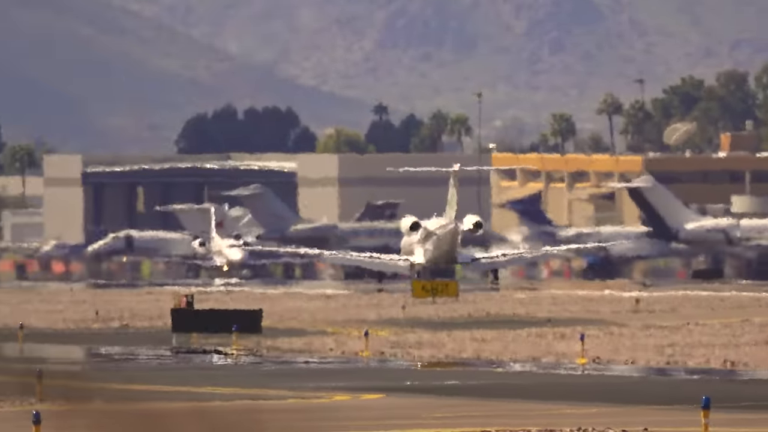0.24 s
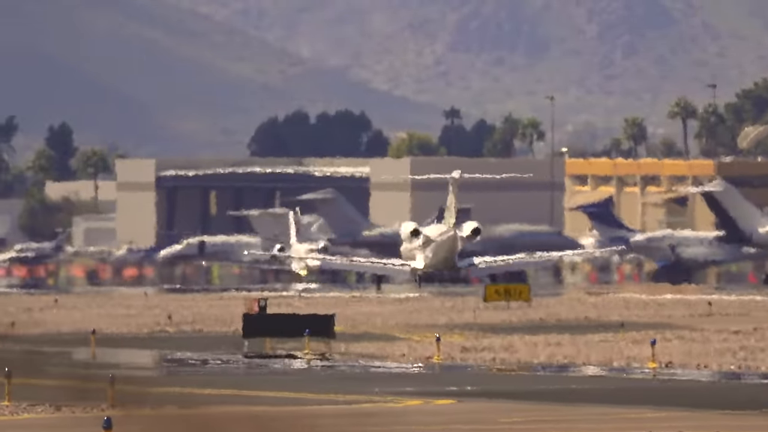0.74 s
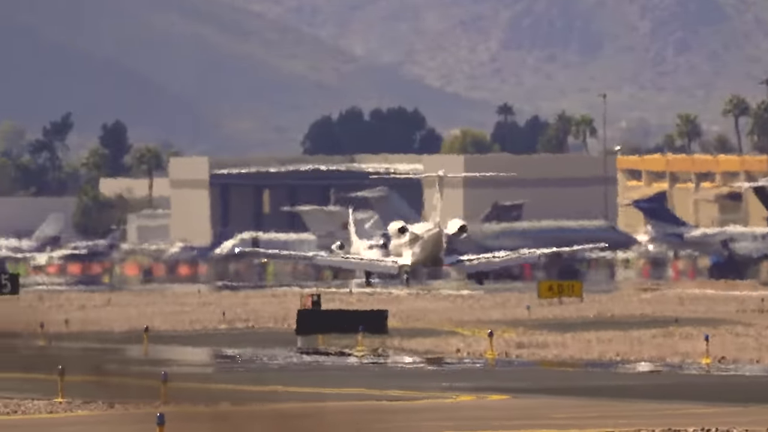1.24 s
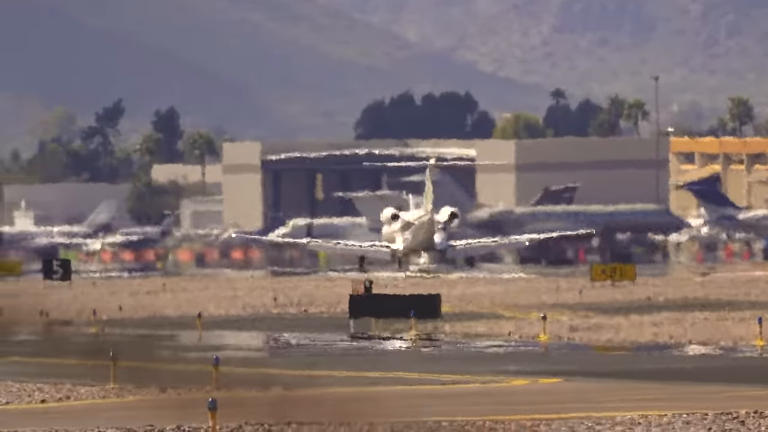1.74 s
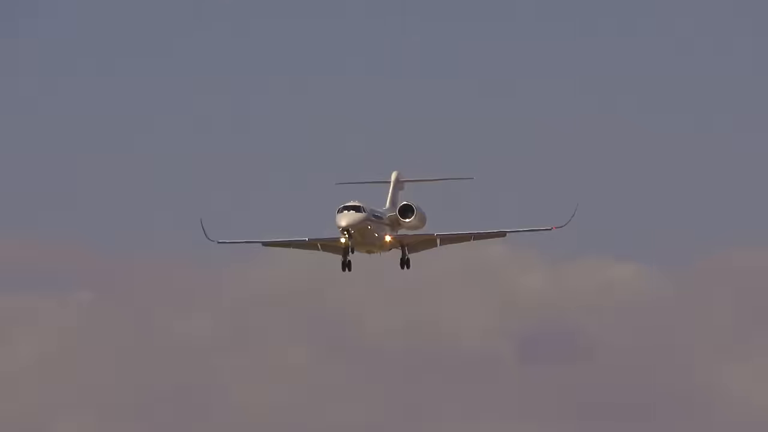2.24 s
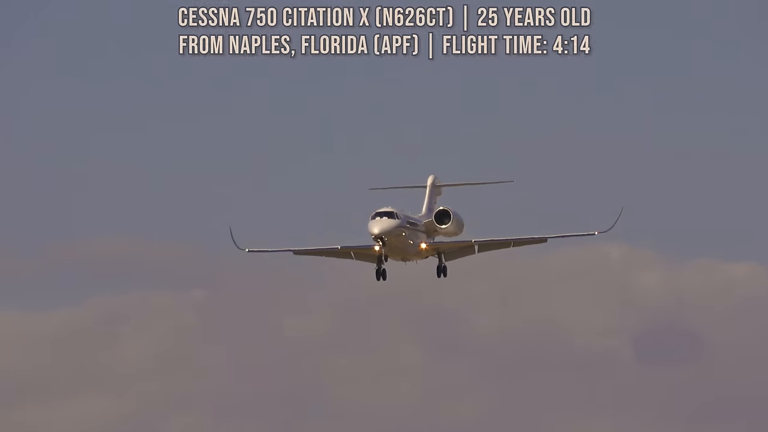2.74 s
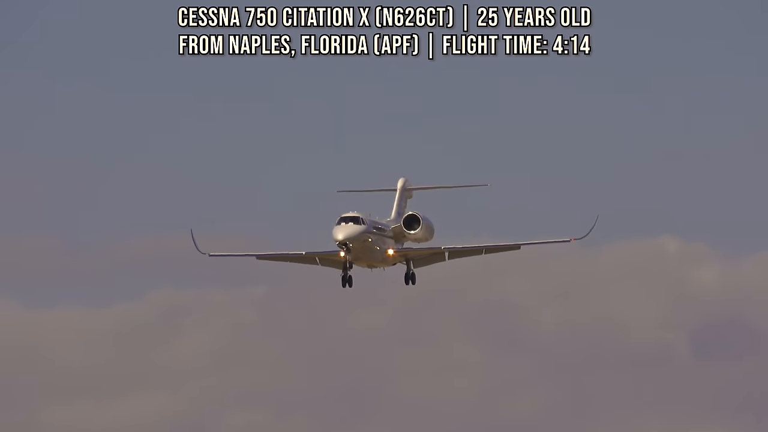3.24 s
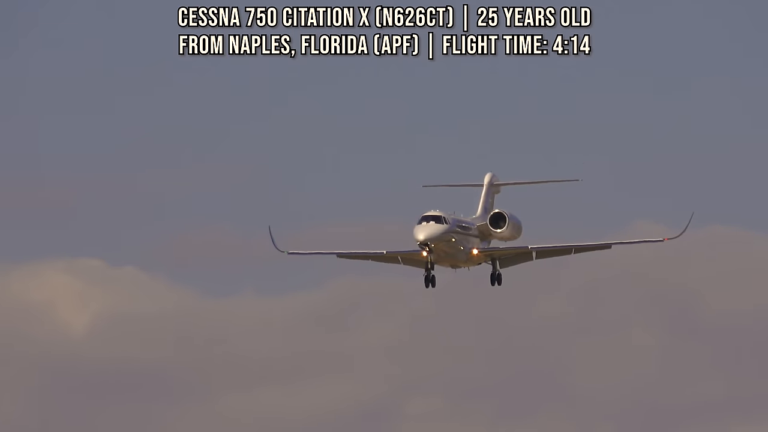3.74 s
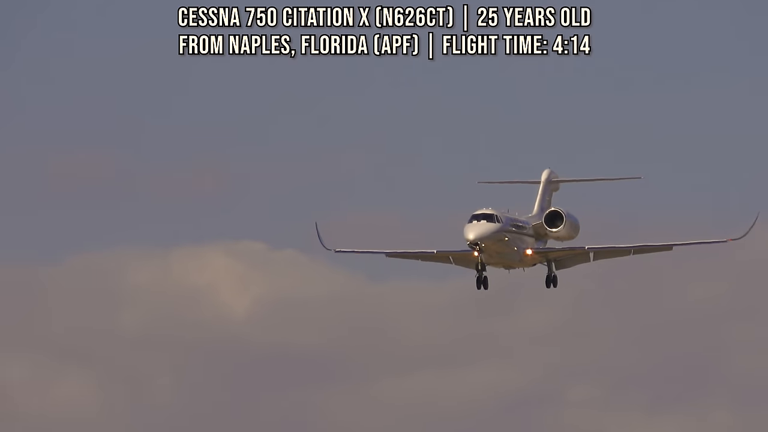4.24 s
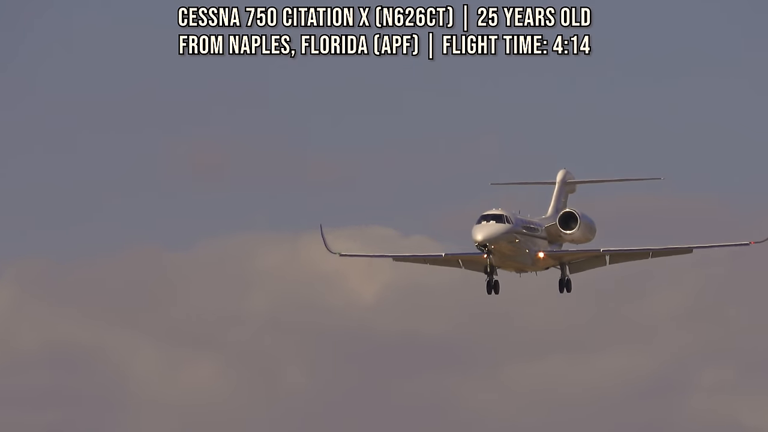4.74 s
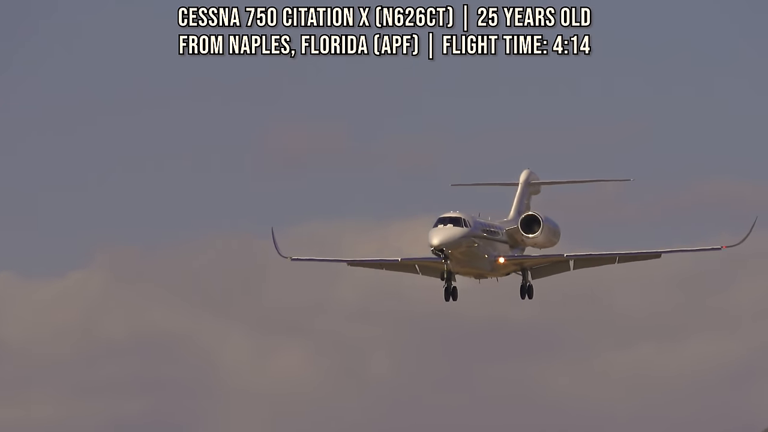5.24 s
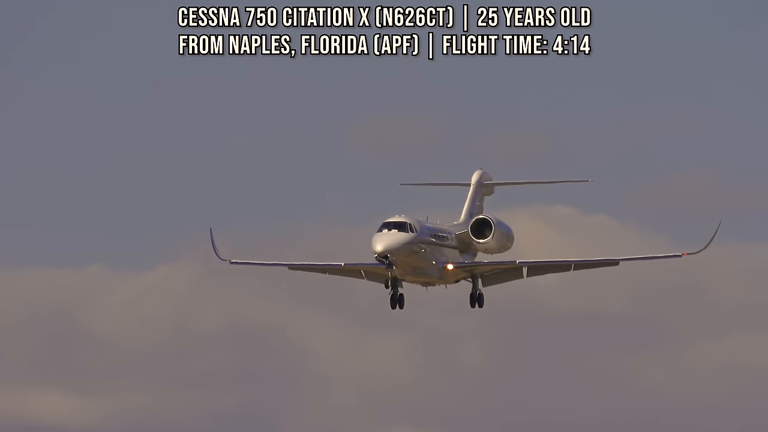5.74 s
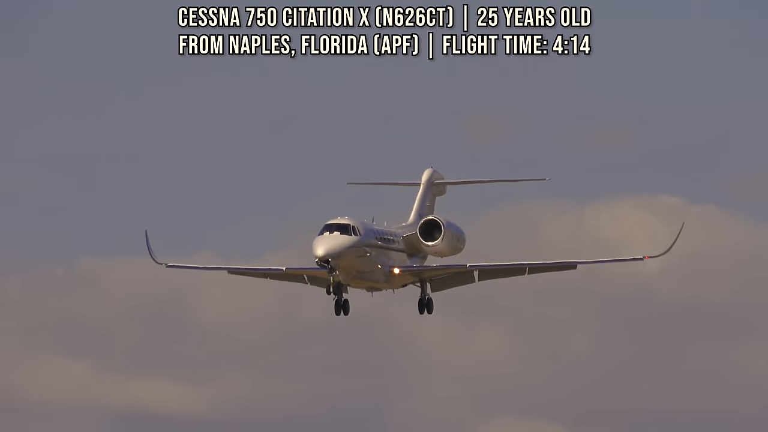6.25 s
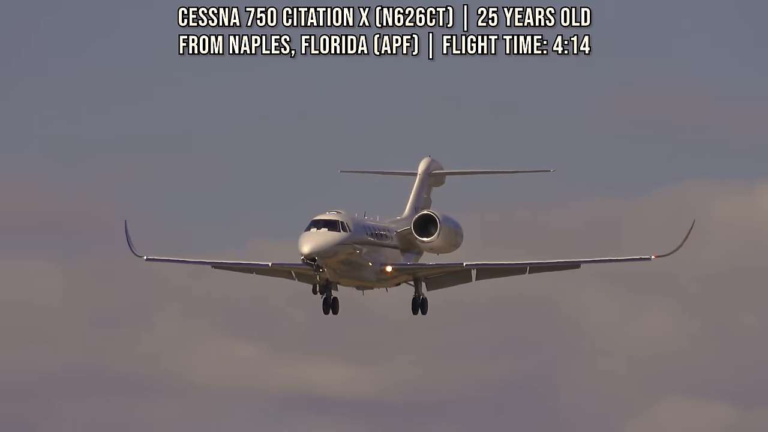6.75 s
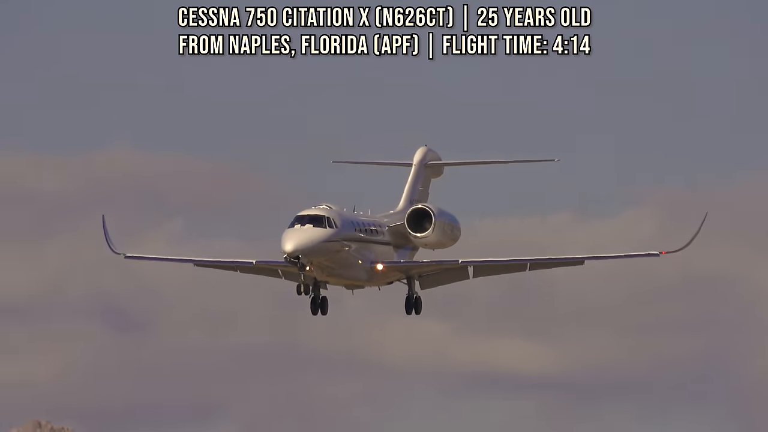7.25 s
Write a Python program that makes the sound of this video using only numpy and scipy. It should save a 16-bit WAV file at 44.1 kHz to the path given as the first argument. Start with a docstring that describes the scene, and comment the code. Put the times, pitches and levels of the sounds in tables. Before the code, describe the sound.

Low far-off jet roar leaning left melts into a wide near jet rush, droning and beating steadily, with hiss flaring and faint ticks.

```python
"""An airfield in two views joined by a cross-fade. First, far engines roar from the left: shaped noise
with thin turbine whines (unsteady sines). An idling engine drones through both views on multiples of one rate.
Then a propeller beats close by, as pulses, in front of a wide jet rush of shaped noise with its own whines;
its treble comes and goes with the turbulent air. Faint ticks, snaps of noise, sit on top.
The recorder rounds off the highest peaks and cuts off the very top of the treble."""
import sys
import numpy as np
from scipy import signal
from scipy.fft import rfft, irfft, next_fast_len
from scipy.io import wavfile
from scipy.ndimage import uniform_filter1d, map_coordinates

SR = 44100
rng = np.random.default_rng(int(sys.argv[2]) if len(sys.argv) > 2 else 0)


def transcribe(signal):
    """Save signal, clipped to [-1, 1], as a 16-bit WAV file at the path in sys.argv[1]."""
    frames = np.atleast_2d(signal).T
    limited = np.clip(frames, -1, 1)
    pcm = np.round(limited * 32767).astype(np.int16)
    wavfile.write(sys.argv[1], SR, pcm)


N = 330750  # samples, 7.5 s


def amp(db):
    """Turn a level in dB into a gain."""
    return 10 ** (np.asarray(db) / 20)


def along(points, hz):
    """Read a curve of (frequency [Hz], value) points on a log frequency axis."""
    point_hz, values = np.transpose(points)
    return np.interp(np.log(hz + 1), np.log(point_hz + 1), values)


def curves(rows):
    """Draw straight lines through the rows: one value per sample for each column after the time."""
    times, *columns = np.transpose(rows)
    t = np.arange(N) / SR
    return np.array([np.interp(t, times, column) for column in columns])


def wobble(rate):
    """A smooth random curve with `rate` random points a second."""
    knots = rng.standard_normal(int(N * rate / SR) + 4)
    return map_coordinates(knots, [np.arange(N) * rate / SR])


def sides(left_db):
    """Left and right gains for a lean to the left in dB; the two gains always add up to 2."""
    share = 1 / (1 + amp(-np.asarray(left_db)))
    return 2 * np.array([share, 1 - share])


def roar(colour, humps, alike, left, bands, levels_db, patchy_db, drift_db, sway_db=0, swell=None):
    """Stereo turbulence noise: each band follows its level, neighbours blend, random patches drift over it."""
    hop = 512  # samples between short spectra
    frames = dict(nperseg=4 * hop, noverlap=3 * hop)
    hz, t, (a, b) = signal.stft(rng.standard_normal((2, N + 2 * hop)), SR, **frames)
    at = np.minimum(np.arange(len(t)) * hop, N - 1)  # sample at each spectrum

    hump_db = sum(db * np.exp(-((hz - centre) / width) ** 2) for centre, width, db in humps)
    shape = amp(along(colour, hz) + hump_db)

    # Cancel the level that the colour alone gives each band, then set the wanted one.
    held = [np.sqrt(2 * np.sum(shape[(hz > lo) & (hz < hi)] ** 2) / (4 * hop)) for lo, hi in bands]
    centres = [np.sqrt(lo * hi) for lo, hi in bands]
    blend = np.array([along(list(zip(centres, row)), hz) for row in np.eye(len(bands))])
    moving_db = blend.T @ (levels_db[:, at] - 20 * np.log10(held)[:, None])

    if swell is not None:  # a narrow lift at the moving frequency, with a wide shallow dip around it
        swell_hz, swell_db = swell[:, at]
        distance = np.log(hz[:, None] / swell_hz + 1e-9)
        lift = np.exp(-(distance / 0.15) ** 2)
        dip = 0.23 * np.exp(-distance ** 2)
        moving_db += swell_db * (lift - dip)

    # Random patches, smoothed over frequency and then over time.
    fields = rng.standard_normal((2, *a.shape))
    fields = uniform_filter1d(uniform_filter1d(fields, size=30, axis=1), size=5, axis=2)
    unrest = np.clip(hz / 2500, .3, 1.2)[:, None]  # eddies disturb short waves most
    patch, drift = fields / fields.std() * unrest

    # Mix two independent noises so that left and right are as alike as wanted.
    turn = np.arccos(np.clip(along(alike, hz), -1, 1))[:, None] / 2
    shared, apart = np.cos(turn) * a, np.sin(turn) * b
    pair = np.array([shared + apart, shared - apart]) / np.cos(turn)

    sway = np.clip(hz / 4000, 0, 1)[:, None] * np.broadcast_to(sway_db, N)[at]
    lean_db = along(left, hz)[:, None] + drift_db * drift + sway
    pair *= shape[:, None] * amp(moving_db + patchy_db * patch) * sides(lean_db)
    return signal.istft(pair, SR, **frames)[1][:, :N]


def tones(table, flutter_db, rate, heard_db=None):
    """Unsteady sines: pitch wavers, level flutters slowly and shivers fast in the air."""
    out = np.zeros((2, N))
    for k, (hz, db, left_db, waver_hz) in enumerate(table):
        cycles = np.cumsum(hz + waver_hz * wobble(25)) / SR + rng.random()
        level_db = db + flutter_db * wobble(rate) + 2.3 * wobble(30)
        if heard_db is not None:
            level_db = level_db + heard_db[k]
        sine = np.sqrt(2) * amp(level_db) * np.sin(2 * np.pi * cycles)
        out += sides(left_db)[:, None] * sine
    return out


def faded():
    """How far the cross-fade has gone, 0 to 1."""
    start_s, length_s = 1.59, 0.87
    return np.clip((np.arange(N) / SR - start_s) / length_s, 0, 1)


def far_engines():
    """Far engines: turbulent exhaust makes a wide noise, turning parts add hums and whines."""
    # Starting levels of rumble, roar, rush and hiss [dB]
    far_levels = [-24.5, -37, -49.5, -63.5]
    # How far each of these four wanders [dB]
    far_sway = [1.3, .5, .4, .4]
    # Colour of the noise: (frequency [Hz], relative level [dB per Hz])
    far_colour = [(22, -31), (45, -26), (55, -9), (120, -3), (270, -7), (450, -13.5), (900, -21.5),
                  (2000, -33.5), (3000, -42.5), (4300, -43.5), (6300, -50), (9200, -59), (10400, -52.5),
                  (11500, -62.5), (15500, -75)]
    # Likeness of left and right: (frequency [Hz], likeness [1 = the same])
    far_alike = [(60, 0.99), (200, 1), (1000, 0.99), (4000, 0.84), (6000, 0.62), (7300, 0.12), (10000, .6),
                 (13000, .3)]
    # Lean to the left: (frequency [Hz], left over right [dB])
    far_left = [(60, 1), (100, -1), (170, -3), (280, 10.5), (470, 8.5), (800, 7), (1340, 7.0), (2240, 8.5),
                (3760, 11), (6300, 10)]
    # Hums and whines: (frequency [Hz], level [dB], left over right [dB], pitch waver [Hz])
    far_tones = [(58.5, -31, -2, 3), (117, -32, -2, 3), (838, -55, 8, 3), (1703, -61, 8, 4),
                 (2171, -65, 9, 4), (2682, -66, 9, 4), (3752, -68, 11, 6), (8258, -78, 9, 6),
                 (10191, -78, 9, 20), (10398, -77, 10, 5), (10428, -75, 10, 5)]
    bands = [(40, 230), (550, 1500), (3000, 6000), (8500, 12000)]  # Hz
    rumble_fall = 2  # dB per second, as the jet rolls away

    levels_db = np.array([db + sway_db * wobble(4) for db, sway_db in zip(far_levels, far_sway)])
    levels_db[0] -= rumble_fall * (np.arange(N) / SR - .8)
    noise = roar(far_colour, [], far_alike, far_left, bands, levels_db, patchy_db=.6, drift_db=1.5)
    return noise + tones(far_tones, flutter_db=0.5, rate=4.4)


def drone():
    """Idling engine: multiples of one shaft rate, each fluttering by itself, heard through both views."""
    # Parts of the hum: (multiple of the shaft rate, level before the gain of each view [dB])
    parts = [(4, -29.5), (5, -49), (6, -39.5), (7, -41.5)]
    shaft_hz = 70.87
    first_gain_db, second_gain_db = -0.4, -6
    first_left_db, second_left_db = 7.5, -7  # left over right in each view

    gone = faded()
    gain_db = first_gain_db + (second_gain_db - first_gain_db) * gone
    left_db = first_left_db + (second_left_db - first_left_db) * gone
    turn = 2 * np.pi * np.cumsum(shaft_hz + 0.11 * wobble(3)) / SR
    hum = 0
    for k, db in parts:
        level = amp(db + 0.74 * wobble(4.6))
        hum = hum + level * np.sin(k * turn + 2 * np.pi * rng.random())
    return sides(left_db) * np.sqrt(2) * amp(gain_db) * hum


def propeller():
    """Propeller: one pressure pulse per blade, so the multiples of the blade rate peak together."""
    # Loudness of the beat: (time [s], level [dB])
    beat_levels = [(1.8, -23), (2.3, -17), (2.8, -16), (3.2, -18), (4.1, -19), (6.2, -18.5), (7.5, -18)]
    # Make-up of each pulse: (multiple of the blade rate, relative level [dB])
    orders = [(1, -4.5), (2, 0), (3, -8.5), (4, -23)]
    blade_hz = 83.17  # blades passing per second

    turn = 2 * np.pi * (np.cumsum(blade_hz + .06 * wobble(2)) / SR + rng.random())
    beat = 0
    for k, db in orders:
        level = amp(db + .4 * wobble(5))
        beat = beat + level * np.cos(k * turn + .08 * wobble(6))
    return sides(-.3)[:, None] * np.sqrt(2) * amp(curves(beat_levels)) * beat


def jet_rush():
    """Near jet: turbulent noise with moving bands, and turbine whines: some follow the rush or its treble,
    one has its own level curve, one sounds briefly."""
    # Rumble and growl: (level at middle_s [dB], rise [dB per s], wander [dB])
    low_rows = [(-19.5, .2, 1.1), (-32, -0.5, 1)]
    # Middle of the rush: (time [s], body level [dB], breath level [dB], rush level [dB])
    middle_rows = [(1.8, -36.5, -31, -31.5), (2.25, -33, -33.5, -32), (2.75, -37.5, -31.5, -32),
                   (3.4, -35.5, -35, -30.5), (3.9, -35.5, -34.5, -31.5), (4.4, -32, -34, -29.5),
                   (5.2, -33.5, -33.5, -29), (5.7, -32, -33, -28), (6.3, -33.5, -35.5, -29),
                   (6.86, -36, -33, -30.5), (7.2, -32, -34, -28.5), (7.5, -32, -32.5, -28)]
    # Treble: (time [s], hiss level [dB], fizz level [dB], sway to the left around its mean [dB])
    treble_rows = [(1.8, -36, -57.5, 12.5), (2.02, -40.5, -50, 13), (2.63, -41, -55, -1.5),
                   (2.93, -42.5, -57.5, -0.5), (3.31, -37, -50.5, 7), (3.42, -31.5, -50, 14),
                   (3.5, -36, -54.5, 14.5), (3.69, -42.5, -55.5, 2.5), (4.16, -38.5, -55, -8),
                   (4.47, -36, -55.5, 1), (4.97, -37, -53.5, -2.5), (5.15, -41, -47.5, -4.5),
                   (5.39, -39, -52, -3.5), (5.63, -32, -45.5, 8), (5.74, -33.5, -49.5, 9),
                   (5.88, -39.5, -51, 5), (5.99, -40.5, -58.5, 1.5), (6.31, -41, -57.5, 2.5),
                   (6.62, -42, -50, -0.5), (7.04, -40.5, -54, -1.5), (7.15, -34.5, -55.5, 4),
                   (7.26, -38, -45.5, 7), (7.31, -39.5, -50, 1.5), (7.5, -38, -51.5, 0.5)]
    # Colour of the noise: (frequency [Hz], relative level [dB per Hz])
    rush_colour = [(22, -40.5), (50, -32), (75, -18), (105, -9), (165, -15), (300, -24.5), (430, -34.5),
                   (680, -20), (1700, -29), (2300, -33), (3000, -40), (4200, -46.5), (7500, -69),
                   (9000, -82.5), (15500, -91)]
    # Broad humps of fan noise on that colour: (frequency [Hz], width [Hz], height [dB])
    fan_humps = [(4200, 170, 2), (5270, 260, 6), (6270, 350, 5.5)]
    # Likeness of left and right: (frequency [Hz], likeness [1 = the same])
    rush_alike = [(100, 1), (300, 1), (430, .75), (650, 1), (1400, 0.93), (2800, 0.99), (4500, 0.87),
                  (6500, 0.36), (9000, .15), (13000, .6)]
    # Lean to the left: (frequency [Hz], left over right [dB])
    rush_left = [(60, -1), (100, -1.5), (170, 1.5), (280, 2.5), (470, -6), (800, 0), (1340, 0.5),
                 (2240, 0.5), (3760, 6), (6300, 6)]
    # A brighter band that wanders through the rush: (time [s], frequency [Hz], strength [dB])
    swell_rows = [(1.6, 2300, 4), (1.95, 2000, 2), (2.25, 1300, 2), (2.7, 1400, 3), (3.0, 1800, 3),
                  (3.2, 2400, 3), (3.4, 3900, 3), (3.6, 3900, .5), (3.75, 1700, .5), (5.0, 1600, 2.5),
                  (7.5, 1690, .5)]
    # Weak turbine whines: (frequency [Hz], level [dB], left over right [dB], pitch waver [Hz])
    weak_whines = [(1094, -51, 0, 8), (1235, -48.5, -1, 4), (2585, -57, 0, 8), (4764, -63, 2, 5),
                   (6160, -71, 3, 5)]
    # Strong turbine whines, same columns; the middle one takes its level from main_whine
    fan_whines = [(4212, -56, 3, 9), (5177, 0, 0, 5), (5318, -58.5, 0, 4)]
    # Level of the middle strong whine: (time [s], level [dB])
    main_whine = [(1.75, -58), (1.95, -49), (2.5, -57.5), (2.8, -65), (3.45, -55), (3.8, -61), (4.5, -52),
                  (5.3, -55.5), (5.65, -51.5), (5.9, -53), (6.05, -48.5), (6.28, -47.5), (6.4, -61),
                  (7.05, -60), (7.3, -50), (7.5, -55)]
    # How far each strong whine follows the treble, 0 for the middle one:
    # (share of hiss [dB per dB], share of fizz [dB per dB])
    follows = [(1.1, 0), (0, 0), (.2, .4)]
    bands = [(90, 155), (260, 330), (550, 950), (950, 1450), (1450, 2800),
             (3000, 4800), (5500, 7500), (9500, 15000)]  # Hz
    middle_s = 4.7  # moment at which the rumble and growl levels hold
    mic_hiss_db = -77.5  # steady faint microphone hiss at the very top
    brief_s, brief_half_s = 2.35, .36  # a high whine heard for a moment: middle and half length
    brief_whine = [(7348, -67, 3, 3)]  # Hz, dB, left over right dB, waver Hz

    t = np.arange(N) / SR
    hiss_db, fizz_db, sway_db = curves(treble_rows)
    low_db = [db + rise * (t - middle_s) + wander_db * wobble(3.03) for db, rise, wander_db in low_rows]
    middle_db = [db + .6 * wobble(6) for db in curves(middle_rows)]
    levels_db = np.array([*low_db, *middle_db, hiss_db, fizz_db, np.full(N, mic_hiss_db)])
    noise = roar(rush_colour, fan_humps, rush_alike, rush_left, bands, levels_db, patchy_db=1.0,
                 drift_db=2.5, sway_db=sway_db - sway_db.mean(), swell=curves(swell_rows))

    rush_change_db = middle_db[-1] - middle_db[-1].mean()
    weak = amp(rush_change_db) * tones(weak_whines, flutter_db=1.5, rate=4.5)
    moment = np.exp(-((t - brief_s) / brief_half_s) ** 4)
    brief = moment * tones(brief_whine, flutter_db=2.0, rate=4)

    heard_db = np.array(follows) @ [hiss_db - hiss_db.mean(), fizz_db - fizz_db.mean()]
    heard_db[1] += curves(main_whine)[0]
    strong = tones(fan_whines, flutter_db=2.3, rate=6, heard_db=heard_db)
    return noise + weak + brief + strong


def ticks():
    """Faint bright ticks from all sides: very short noise snaps, some at set times and a weaker scatter."""
    # Ticks at set times: (time [s], level [dB])
    set_ticks = [(2.365, -44.5), (2.9607, -53.5), (4.2368, -53.5), (4.574, -50.5), (4.7182, -55.5),
                 (5.0519, -54), (5.2734, -48), (5.3198, -52), (5.417, -50.5), (5.5618, -47.5),
                 (5.6345, -43), (5.8958, -53.5), (5.9336, -50.5), (6.6057, -53), (6.7281, -52),
                 (7.014, -56.5), (7.288, -51), (7.3562, -52)]
    draw = rng.random((90, 2))
    scatter = np.c_[2.3 + 5.1 * draw[:, 0], -64 + 9 * draw[:, 1] ** 2]  # same columns
    out = np.zeros((2, N + 128))
    t = np.arange(128) / SR
    for s, db in [*set_ticks, *scatter]:
        # 8 dB extra ahead of the filter; the snap dies by 60 dB in 2 ms
        snap = amp(db + 8.0 - 60 * t / .002) * rng.standard_normal(len(t))
        start = round(s * SR)
        out[:, start:][:, :len(t)] += sides(rng.normal(0, 4))[:, None] * snap
    bright = signal.butter(1, [6500, 13000], "band", fs=SR, output="sos")
    return signal.sosfilt(bright, out[:, :N])


def scene():
    """Cross-fade from the first view to the second, with the drone running through both."""
    turn = faded() * np.pi / 2
    first = np.abs(np.cos(turn))
    second = np.sin(turn) ** 0.79  # rises a little sooner than a plain sine
    return first * far_engines() + drone() + second * (propeller() + jet_rush() + ticks())


def record(dry):
    """Recorder: a soft ceiling rounds off the peaks, then everything above the top frequency is cut."""
    ceiling, top_hz = .7, 15760  # ceiling as a share of full scale
    soft = dry / (1 + np.abs(dry / ceiling) ** 6) ** (1 / 6)
    m = next_fast_len(N + 8192)
    kept = np.fft.rfftfreq(m, 1 / SR) < top_hz
    return irfft(rfft(soft, m) * kept, m)[:, :N]


dry = scene()
out = record(dry)
transcribe(out)
```